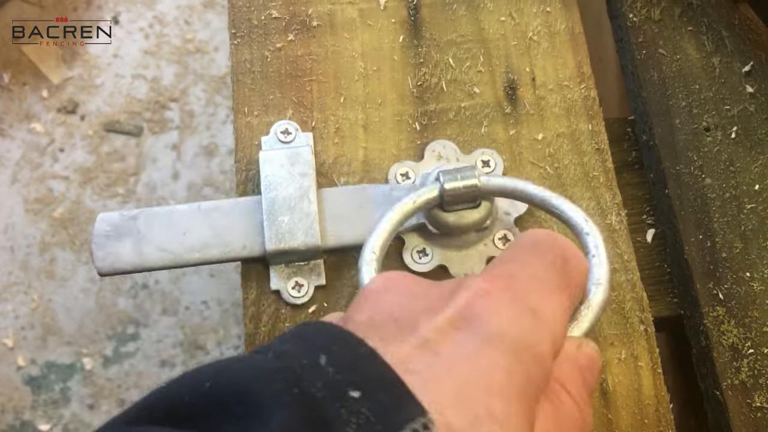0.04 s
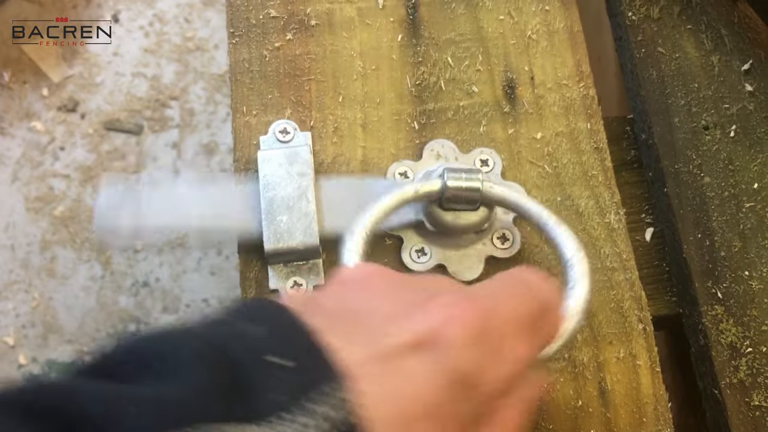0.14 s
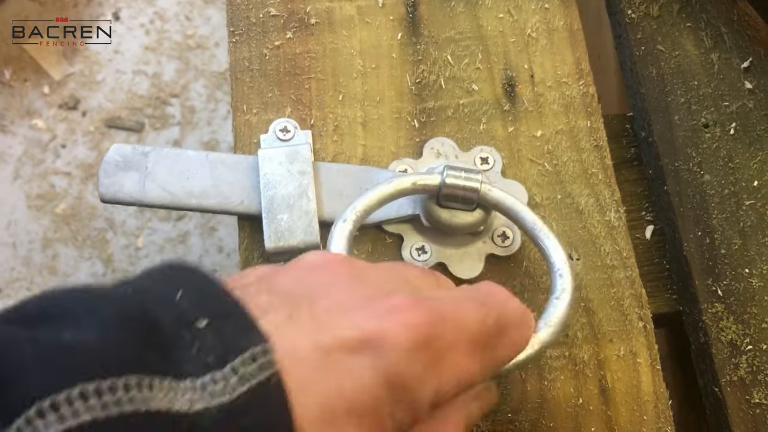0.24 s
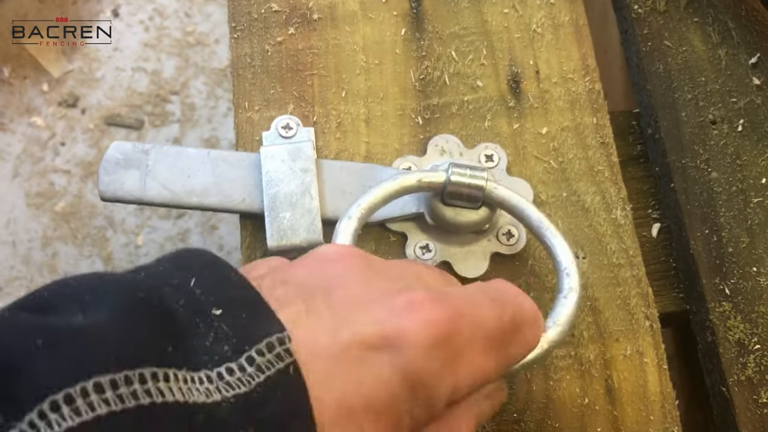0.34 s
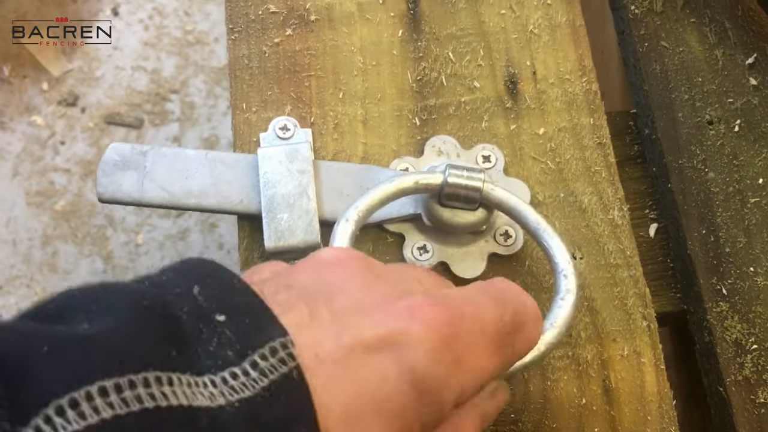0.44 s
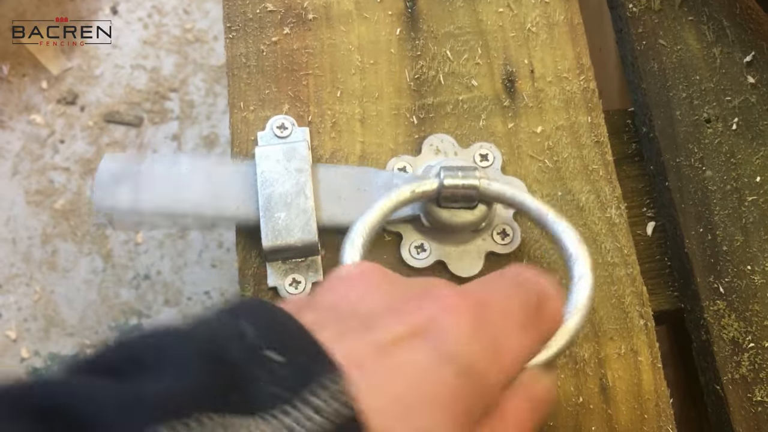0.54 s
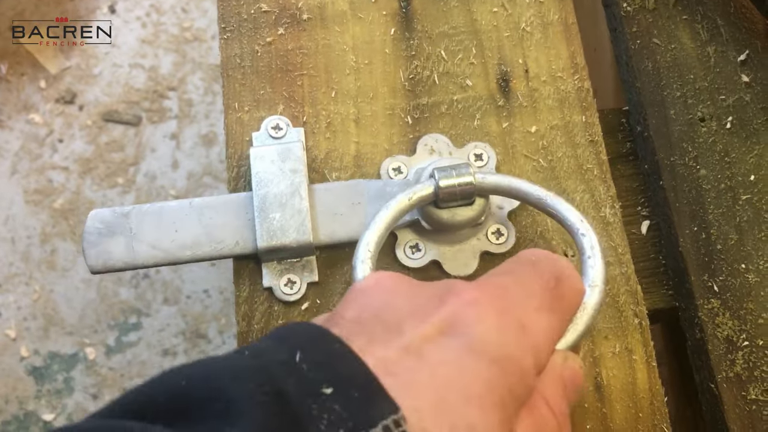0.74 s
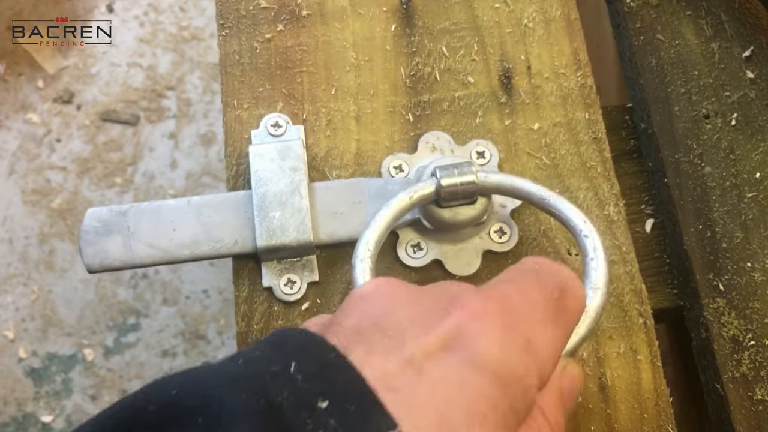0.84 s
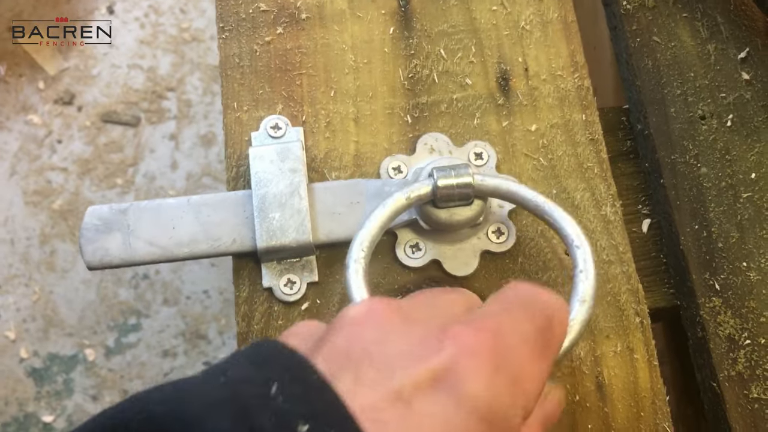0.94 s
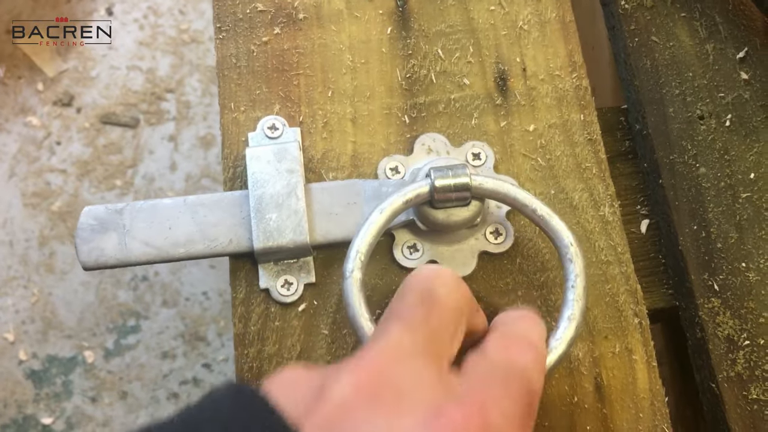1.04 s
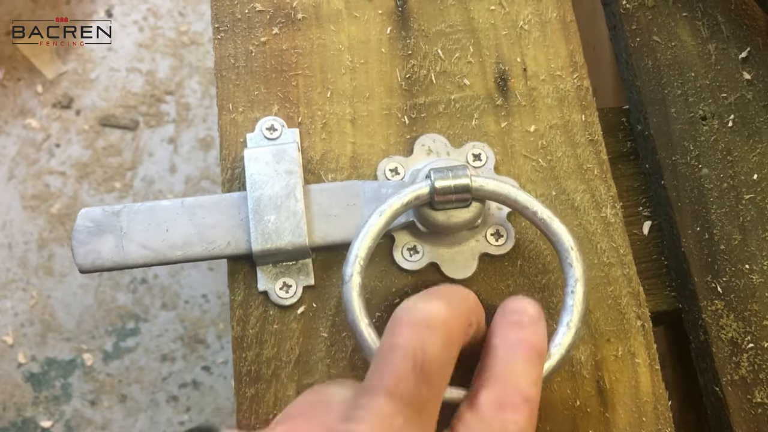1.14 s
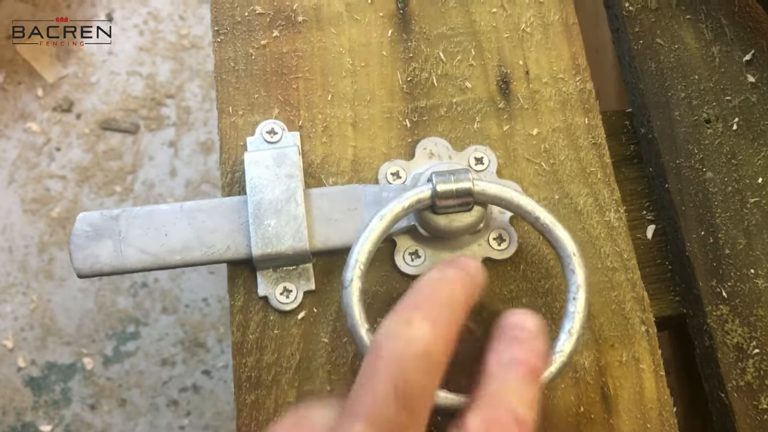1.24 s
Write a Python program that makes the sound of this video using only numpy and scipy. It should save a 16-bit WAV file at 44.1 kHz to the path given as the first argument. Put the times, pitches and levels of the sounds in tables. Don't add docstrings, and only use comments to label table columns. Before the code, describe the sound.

A steel ring latch on a wooden gate chinks, clacks up, then drops with a duller clack

```python
import sys
import numpy as np
from scipy import signal
from scipy.fft import rfft, irfft
from scipy.io import wavfile
from scipy.ndimage import uniform_filter1d, minimum_filter1d

SR = 44100
rng = np.random.default_rng(int(sys.argv[2]) if len(sys.argv) > 2 else 0)


def gain_from_db(level_db):
    decades = np.asarray(level_db, float) / 20
    return 10 ** decades


def materialize(psi):
    bounded = np.clip(np.atleast_2d(psi).T, -1, 1)
    quanta = np.round(bounded * 32767).astype(np.int16)
    wavfile.write(sys.argv[1], SR, quanta)


N = 57330
LEAD = 8192
SPAN = N + LEAD

# t/s, bar level/dB, board level/dB, crack level/dB
UP_BLOWS = [
    (-.13, -7, -31.5, -32),
    (.2188, 1, -12.5, -18),
    (.2218, -14, -20.5, -37),
    (.2256, -8.5, -17, -27),
]
# t/s, bar level/dB, board level/dB, crack level/dB
DOWN_BLOWS = [
    (0.6381, -3, -29.5, -34),
    (0.6412, -12.5, -21.5, -43),
]
# t/s, ring level/dB, bar level/dB, board level/dB, crack level/dB
CHINKS = [(0.1163, -70.5, -40, -46, -59), (0.1178, -50, -25, -32, -45), (0.125, -50, -32, -44.5, -43.5),
          (0.1278, -51.5, -22, -24.5, -49), (.1320, -28, -23, -38, -35), (0.1431, -56.5, -43, -30.5, -45),
          (0.186, -80.5, -45, -37, -59.5), (.2370, -49.5, -31, -49.5, -35), (0.499, -82, -46.5, -50, -77.5),
          (0.5139, -77, -50, -42, -78.5), (0.5543, -76, -39, -47.5, -79), (.5600, -71, -45, -51, -62.5),
          (0.568, -54.5, -34.5, -46, -65), (0.5734, -75, -37.5, -47.5, -70.5),
          (0.59, -68, -69, -54.5, -63.5), (0.6056, -66, -50, -44, -70.5), (0.6233, -44, -36, -64.5, -46),
          (0.628, -42.5, -32.5, -58.5, -64.5), (0.639, -32, -58, -52, -56.5)]


def evened(x):
    return x / np.sqrt(np.mean(x ** 2) + 1e-20)


def read(points, hz):
    f, value = np.transpose(points)
    return np.interp(np.log(hz + 1), np.log(f + 1), value)


def shaped(x, points):
    gain = gain_from_db(read(points, np.fft.rfftfreq(SPAN, 1 / SR)))
    return evened(irfft(rfft(x, SPAN) * gain, SPAN))


def coloured(x, shape_db):
    hz, t, z = signal.stft(x, SR, nperseg=256, noverlap=192)
    z = z * gain_from_db(shape_db(hz[:, None], t))
    return signal.istft(z, SR, nperseg=256, noverlap=192)[1][:len(x)]


def ringing(modes, rise_s=0.000067, waver=0):
    t = np.arange(SR // 2) / SR
    hand = rng.standard_normal((len(modes), len(t)))
    for _ in range(2):
        hand = uniform_filter1d(hand, round(0.003 * SR))
    x = np.zeros(len(t))
    for k, (hz, db, t60) in enumerate(modes):
        fade = gain_from_db(db - 60 * t / max(t60, .004))
        unsteady = 1 - waver + waver * evened(hand[k])
        x += (-1) ** k * fade * np.sin(2 * np.pi * hz * t) * unsteady
    x = x * (1 - np.exp(-t / rise_s))
    return x / abs(x).max()


def damped(peaks):
    modes = []
    for hz, width, db in peaks:
        t60 = np.log(1000) / (np.pi * max(width, 100))
        modes.append((hz, db + 20 * np.log10(width), t60))
    return modes


def rattled(body):
    rattle_s = 0.0012
    t = np.arange(SR // 50) / SR
    touches = rng.standard_normal(len(t)) * (rng.random(len(t)) < .1)
    x = signal.fftconvolve(body, touches * t / rattle_s * np.exp(-2 * t / rattle_s))
    return x / abs(x).max()


def struck(rows, body, axis):
    train = np.zeros(SPAN)
    for row in rows:
        train[LEAD + round(row[0] * SR)] += gain_from_db(row[axis])
    return signal.fftconvolve(train, body)[:SPAN]


def cracks(rows, t60, edges_hz):
    fade = struck(rows, gain_from_db(-60 * np.arange(SR // 10) / SR / t60), axis=-1)
    band = signal.butter(2, np.clip(edges_hz, 100, 20000), "band", fs=SR, output="sos")
    return fade * evened(signal.sosfilt(band, rng.standard_normal(SPAN)))


def air():
    # f/Hz, level/dB per Hz
    air_colour = [(25, -19), (60, -7), (250, 3), (1000, -9), (2400, -17), (6000, -21), (10000, -27),
                  (16000, -30)]
    return gain_from_db(-66) * shaped(rng.standard_normal(SPAN), air_colour)


def shed(near, shakes):
    # f/Hz, t60/s
    echo_times = [(100, 0.66), (260, .36), (700, 0.41), (1840, 0.42), (4850, 0.43), (12800, 0.31)]
    gap_s, fill_s, near_db = 0.0013, 0.0032, -16.5
    flat = [(20, 0), (20000, 0)]
    t, out = np.arange(SR) / SR, np.zeros(SPAN)
    for x, colour in [(gain_from_db(near_db) * near, flat), *shakes]:
        tail = coloured(rng.standard_normal(SR), lambda hz, s: read(colour, hz) - 60 * s / read(echo_times, hz))
        tail = tail * (1 - np.exp(-np.maximum(t - gap_s, 0) / fill_s))
        out += signal.fftconvolve(x, tail / np.linalg.norm(tail))[:SPAN]
    return out


def fingers():
    # t/s, effort/dB
    rub_effort = [(0.94, -65), (0.958, -78), (1.01, -79.5), (1.018, -72), (1.074, -63.5), (1.202, -69),
                  (1.238, -77.5), (1.292, -64), (1.3, -67.5)]
    # t/s, effort/dB
    grip_effort = [(.11, -46.5), (.135, -39.5), (.215, -33.5), (.25, -61), (.49, -64.5), (.525, -51),
                   (.55, -52), (.6, -39.5), (.635, -43), (.66, -78.5)]
    # f/Hz, level/dB per Hz
    rub_colour = [(60, -25), (170, -3.5), (350, -9), (630, -11.5), (800, -16.5), (1700, -13.5), (2600, -22),
                  (5000, -25.5), (12000, -42)]
    # f/Hz, level/dB per Hz
    grip_colour = [(29, -48.5), (50, -15), (207, 0.5), (560, -18.5), (789, -11), (936, -23.5), (1560, -20),
                   (3000, -39.5), (3900, -60.5), (6600, -120)]
    slips_per_s, spread_db, hiss_db, rub_trim_db = 310, 2, 11, 3.5

    t = (np.arange(SPAN) - LEAD) / SR
    slips = (rng.random(SPAN) < slips_per_s / SR) * gain_from_db(spread_db * rng.exponential(1, SPAN))
    slips = slips * rng.choice([-1, 1], SPAN)
    skin = evened(uniform_filter1d(slips, size=24)) + gain_from_db(hiss_db) * rng.standard_normal(SPAN)
    grip_db = np.interp(t, *np.transpose(grip_effort), left=-120, right=-120)
    rub_db = rub_trim_db + np.interp(t, *np.transpose([(.75, -110)] + rub_effort))
    grip = gain_from_db(grip_db) * shaped(skin, grip_colour + [(8000, -68.5)])
    return grip + gain_from_db(rub_db) * shaped(skin, rub_colour)


def ticks():
    # t/s, level/dB, f/Hz, t60/s
    notes_struck = [(0.1174, -36.5, 4190, 0.018), (0.1175, -44.5, 7100, .015), (.1435, -46, 9200, 0.013),
                    (.237, -43, 11040, .012), (0.501, -51, 1560, 0.023), (0.2195, -22, 11900, 0.004),
                    (.2192, -41, 14400, .005), (.56, -53, 6160, .012), (.56, -62, 7800, .01),
                    (.592, -62, 5500, .02), (1.006, -72.5, 7280, .012), (1.066, -58, 232, 0.067),
                    (1.079, -50, 198, .08), (1.123, -57, 175, .1), (1.17, -57.5, 427, .08)]
    return sum(struck([row], ringing([(row[2], 0, row[3])], .0003), axis=1) for row in notes_struck)


def jolts():
    # f/Hz, level/dB per Hz
    jolt_up = [(35, -62.5), (60, -29.5), (274, 0.5), (2300, -10.5), (3340, -18.5), (3640, -29), (4320, -19),
               (7060, -23), (16000, -79)]
    # f/Hz, level/dB per Hz
    jolt_down = [(35, -53.5), (60, -24), (268, 2.5), (363, -3.5), (437, 1), (1140, -9.5), (1580, -9),
                 (8500, -31), (16000, -55)]
    # f/Hz, level/dB per Hz
    jolt_loose = [(200, -13), (450, 0), (900, 1.5), (1500, -4), (4000, -12), (9200, -10), (10500, -23.5),
                  (16000, -34.5)]
    up = gain_from_db(10) * struck(UP_BLOWS[:2], [1], axis=1)
    down = gain_from_db(9) * struck(DOWN_BLOWS[:1], [1], axis=1)
    loose = gain_from_db(26) * struck(CHINKS, [1], axis=4)
    return (up, jolt_up), (down, jolt_down), (loose, jolt_loose)


def thin_tones():
    # f/Hz, level/dB, t60/s
    tones_up = [(994, -2, 0.18), (1255, 2, .3), (1916, -6, 0.15), (2210, -2.5, 0.36), (2445, -2, 0.27),
                (2616, -6.5, 0.4), (3410, -12, 0.4), (3880, -3.5, 0.26), (4420, 0, 0.26), (4740, -4.5, 0.16),
                (5288, -11, 0.1), (5970, -9, 0.21), (6160, -11.5, 0.37), (6990, -11, 0.27)]
    # f/Hz, level/dB, t60/s
    tones_down = [(1208, 0.5, 0.17), (1560, -2, 0.22), (1670, -2, 0.35), (1814, -10, 0.3), (2240, -8, 0.28),
                  (4339, -7, 0.13), (5050, -12.5, 0.24), (6164, -18, 0.35), (6848, -13, 0.34),
                  (7219, -14.5, 0.33), (9076, -23, 0.32)]
    up = gain_from_db(-20) * struck(UP_BLOWS[:2], ringing(tones_up, 0.0032, .4), axis=1)
    down = gain_from_db(-25) * struck(DOWN_BLOWS[:1], ringing(tones_down, .004, .4), axis=1)
    return up + down


def latch():
    # f/Hz, width/Hz, level/dB
    bar_up = [(1020, 74, -4), (1670, 105, 2.5), (2024, 90, -3.5), (2380, 90, -7.5), (2690, 100, -7.5),
              (2923, 65, -6.5), (3070, 48, -8.5), (4125, 67, -9.5), (4723, 120, -13.5), (5290, 180, -25),
              (4350, 100, -16.5), (6120, 220, -15), (7210, 300, -17), (8010, 220, -27)]
    bar_down = [(1404, 220, -4.5), (1659, 81, 1.5), (2072, 75, 2), (2665, 120, -8.5), (3070, 74, -9.5),
                (3270, 140, -16.5), (3500, 180, -12.5), (3980, 55, -9), (4350, 150, -16.5),
                (5060, 150, -18), (5710, 68, -22.5), (6420, 64, -14.5), (7480, 220, -20.5),
                (7890, 60, -32.5)]
    bar_loose = [(830, 310, 1), (1670, 250, 3), (1970, 95, 5.5), (2405, 42, 9), (2700, 100, -0.5),
                 (3550, 970, -12.5), (4497, 430, -15.5)]
    # f/Hz, level/dB, t60/s
    ring_up = [(4083, -1.5, 0.052), (5430, -6.5, 0.15), (6860, -12, 0.12), (7460, 14.5, 0.019),
               (8970, -12, .16), (9200, -15.5, 0.3), (11560, -13, 0.18), (11900, -13, 0.16),
               (13250, -16.5, .18)]
    ring_down = [(5530, -1, 0.046), (5780, 15, 0.048), (7400, -5.5, 0.045), (8300, -5.5, 0.046),
                 (11400, -15, 0.4), (11320, -19.5, .25)]
    # f/Hz, level/dB, t60/s
    boards_up = [(175, -12.5, 0.071), (266, -9, 0.17), (310, -10, 0.17), (406, -4, 0.12), (508.7, 4, 0.41),
                 (547, 3.5, 0.15), (664, 2.5, 0.2), (819, -16, 0.36)]
    boards_down = [(148.1, -8, 0.31), (206, -8, 0.12), (269.3, -5.5, .16), (430.5, 2.5, 0.14),
                   (566, -10, 0.078), (674, -18, 0.097), (808, -9.5, 0.18), (967, 1.5, 0.054)]
    boards_loose = [(181.4, -7, 0.089), (228.4, -7.5, 0.1), (375, -0.5, 0.11), (428, -5, .06),
                    (497, -5, 0.074), (600, 2, 0.017), (972, -7.5, 0.076)]
    turn_s, hand_waver, board_rise_s = .4, .85, 0.013

    steel = struck(UP_BLOWS, ringing(damped(bar_up)), axis=1)
    steel -= struck(DOWN_BLOWS, ringing(damped(bar_down)), axis=1)
    steel += struck(CHINKS, rattled(ringing(damped(bar_loose))), axis=2)

    lifting = [c for c in CHINKS if c[0] < turn_s]
    lowering = [c for c in CHINKS if c[0] > turn_s]
    steel += struck(lifting, ringing(ring_up, 0.00048, hand_waver), axis=1)
    steel += struck(lowering, ringing(ring_down, .001, hand_waver), axis=1)

    wood = struck(UP_BLOWS, ringing(boards_up, board_rise_s), axis=2)
    wood += struck(DOWN_BLOWS, ringing(boards_down, board_rise_s), axis=2)
    wood += struck(CHINKS, ringing(boards_loose, 0.0045), axis=3)

    crack = cracks(UP_BLOWS + DOWN_BLOWS, t60=.012, edges_hz=(2443, 10120))
    scrape = cracks(CHINKS, t60=0.034, edges_hz=(1500, 7800))
    return steel + wood + crack + scrape


def scene():
    near = latch() + fingers()
    echo = shed(near, jolts())
    return (near + echo + thin_tones() + ticks())[None, LEAD:]


def dulled(x):
    # t/s, length/s, top f/Hz, lowest thinned f/Hz
    dull_moments = [(.278, .034, 8400, 3000), (0.333, 0.014, 8400, 3200), (0.38, 0.019, 8300, 3150),
                    (.802, .014, 8200, 5000), (0.844, 0.025, 9200, 4800), (.913, 0.02, 8870, 4500),
                    (1.107, 0.035, 9000, 2800)]
    drop_db, kept_db = -20, 3
    hz, t, z = signal.stft(x[0], SR, nperseg=1024, noverlap=896)
    power = uniform_filter1d(abs(z) ** 2, size=5) + 1e-18
    gain_db = np.zeros(z.shape)
    for s, length, top_hz, low_hz in dull_moments:
        now = power[:, np.argmin(abs(t - s))]
        over_db = 10 * np.log10(now / uniform_filter1d(now, size=21)) - 2 * (hz - low_hz) / top_hz
        thinned = np.where(over_db < 0, drop_db, kept_db) * np.clip((hz - low_hz) / 600, 0, 1)
        lost = np.where(hz > top_hz, 1.5 * drop_db, thinned)
        gain_db += lost[:, None] * np.clip((length / 2 - abs(t - s)) / .008 + .5, 0, 1)
    return signal.istft(z * gain_from_db(gain_db), SR, nperseg=1024, noverlap=896)[1][None, :N]


def top_cut(x):
    return signal.sosfilt(signal.butter(12, 16470, fs=SR, output="sos"), x)


def record(dry):
    low_hz, top_hz, ceiling = 111, 15800, .7
    x = signal.sosfilt(signal.butter(3, low_hz, "high", fs=SR, output="sos"), dry) + air()[LEAD:]
    room = np.minimum(ceiling / (abs(x) + 1e-9), 1)
    x = x * uniform_filter1d(minimum_filter1d(room, size=81), size=41)
    x = signal.fftconvolve(dulled(x), signal.firwin(101, top_hz, fs=SR)[None], "same")
    return top_cut(x)


dry = scene()
out = record(dry)
materialize(out)
```